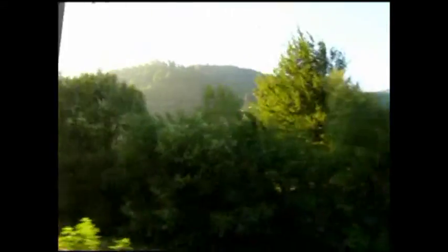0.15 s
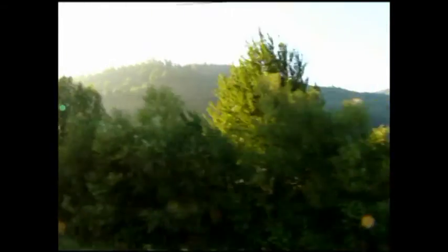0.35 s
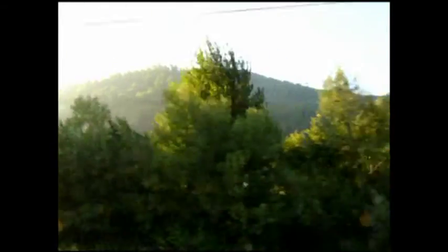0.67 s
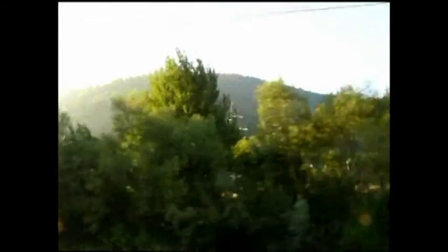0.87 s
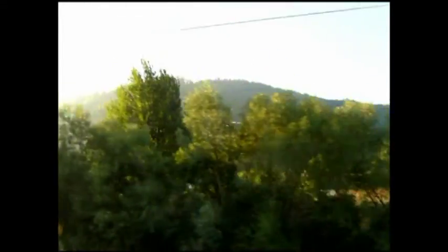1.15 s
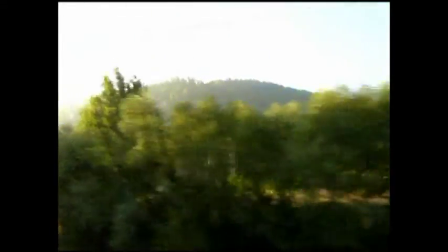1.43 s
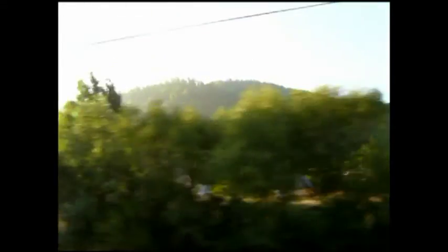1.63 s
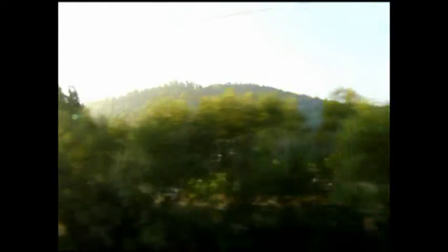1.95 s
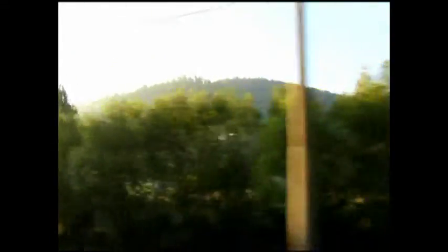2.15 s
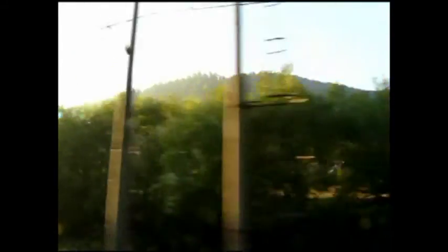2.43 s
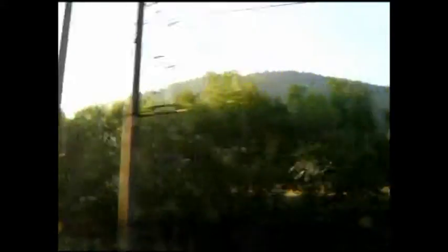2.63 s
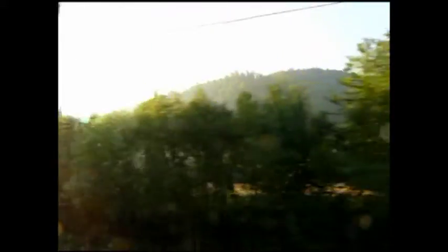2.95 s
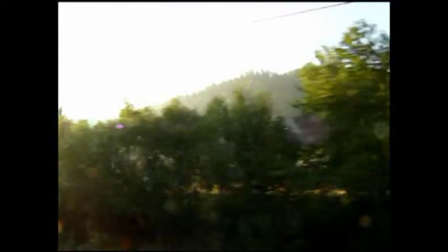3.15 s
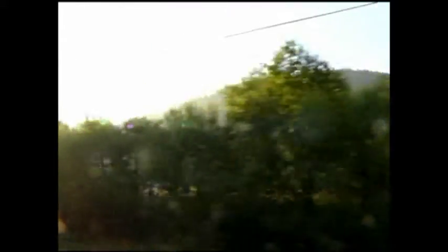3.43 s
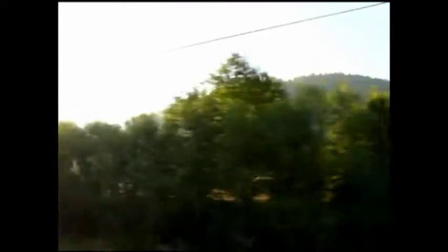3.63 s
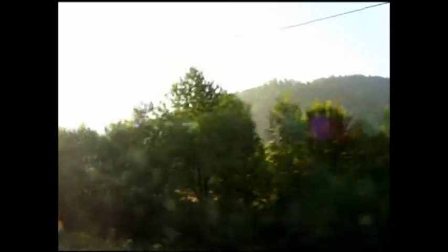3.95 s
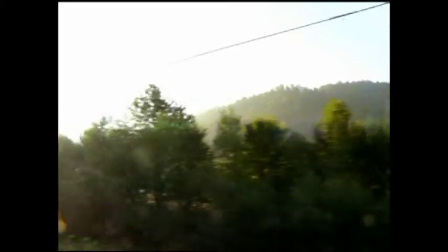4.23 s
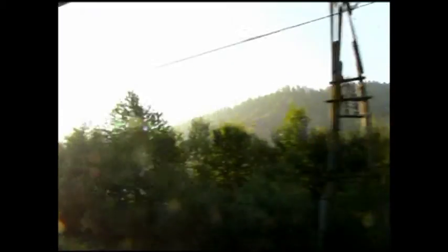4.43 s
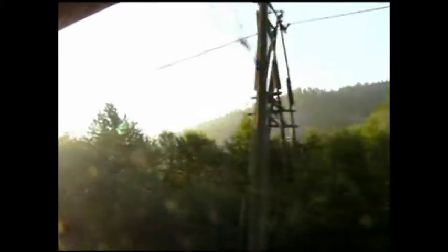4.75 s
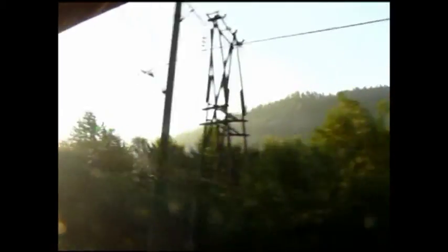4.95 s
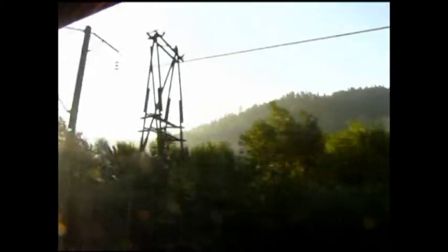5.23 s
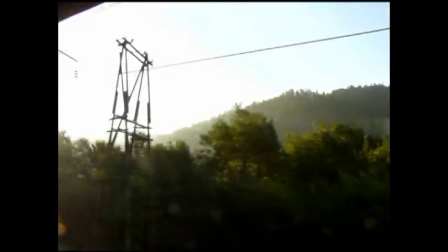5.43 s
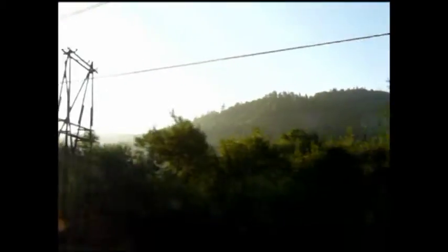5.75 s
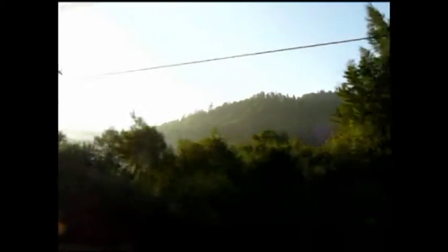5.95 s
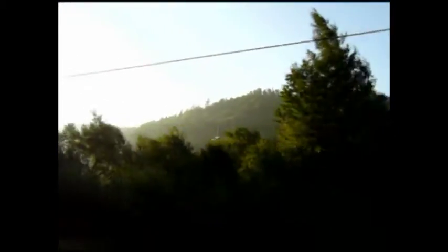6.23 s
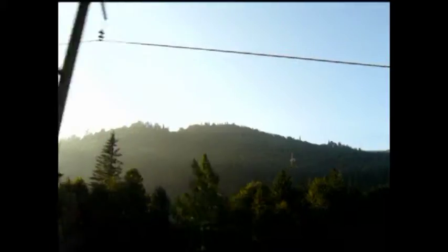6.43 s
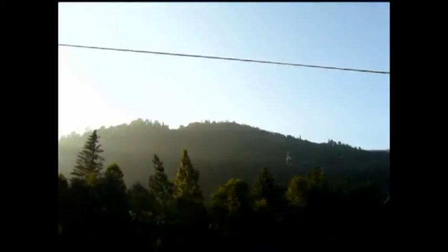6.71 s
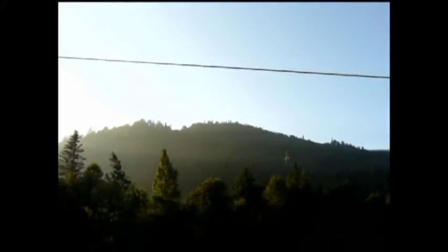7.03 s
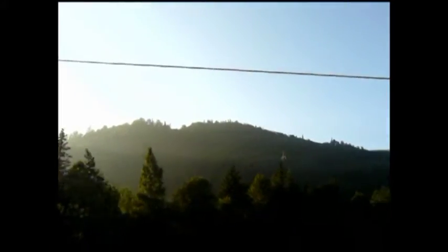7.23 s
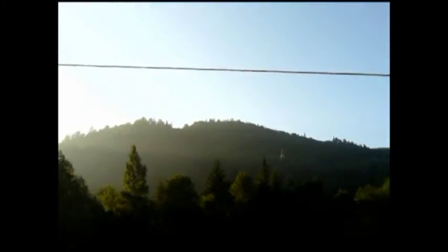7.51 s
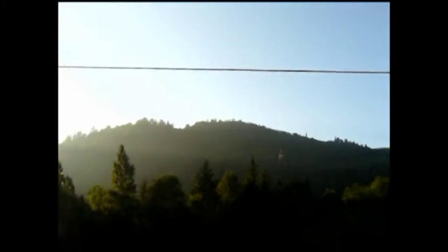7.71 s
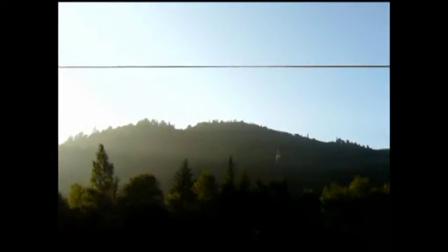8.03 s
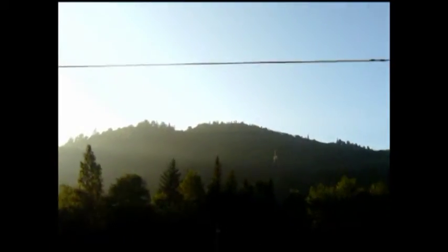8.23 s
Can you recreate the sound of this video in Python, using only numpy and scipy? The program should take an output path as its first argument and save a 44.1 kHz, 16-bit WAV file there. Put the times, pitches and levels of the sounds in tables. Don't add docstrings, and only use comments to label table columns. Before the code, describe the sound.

Inside a moving rail carriage, a continuous wheel roar fills the sound: deep body rumble, hollow midrange panel drone and muted hiss, flickering unevenly. A thud and rattling crack land near 0.3 s, followed by smaller knocks through 1.4 s. Harder jolts strike around 1.7, 2.0 and 2.8 s, the last with a bright burst of fittings rattle, then another at 3.4 s. From 3.6 to 5.6 s the rolling is somewhat quieter, with scattered dull bumps and a crack near 4.9 s. At about 5.8 s rough track begins: heavy thumps come several per second, the roar surges from 6.4 to 7.1 s, and dense bangs, cracks and shivering panels continue until the end at about 8.4 s. The small camera microphone is close, dull and band-limited, with faint grainy treble; its level ducks after hard hits and recovers.

```python
import sys
import numpy as np
from scipy import signal
from scipy.fft import rfft, irfft, next_fast_len
from scipy.io import wavfile
from scipy.ndimage import uniform_filter1d

SR = 44100
rng = np.random.default_rng(int(sys.argv[2]) if len(sys.argv) > 2 else 0)


def to_linear_factor(level_db):
    exponent = np.asarray(level_db, float) / 20
    return 10 ** exponent


def store_pcm(level_fs):
    pcm = np.round(np.clip(level_fs, -1, 1) * 32767).astype(np.int16)
    wavfile.write(sys.argv[1], SR, np.atleast_2d(pcm).T)


N = 369116
FFT = next_fast_len(N)
TIME, HZ = np.arange(N) / SR, np.fft.rfftfreq(FFT, 1 / SR)


def unit(x):
    return x / np.sqrt(np.mean(x ** 2))


def colour(table):
    hz, db = np.transpose(table)
    return to_linear_factor(np.interp(np.log(HZ + 1), np.log(hz), db))


def walk(rate):
    hold = int(SR / rate)
    held = np.repeat(rng.standard_normal(N // hold + 1), hold)
    slewed = uniform_filter1d(uniform_filter1d(held, hold), hold)
    return unit(slewed[:N])


# frequency in Hz, density in dB per Hz.
ROAR_SPECTRUM = [(18, -34), (40, -13), (110, -8), (244, -5.5), (312, -8.5), (460, -6.5), (765, -8.5),
                 (900, -16), (1270, -19), (1900, -21), (2700, -17.5), (3400, -25), (3800, -25.5),
                 (4000, -25)]
# resonance in Hz, width in Hz, lift in dB.
PANEL_RESONANCES = [(261.4, 50, 7), (379, 56, 6), (998, 69, 6.5), (1600, 150, 6.5), (2284, 240, 3),
                    (3090, 57, 1)]
# lower edge in Hz, upper edge in Hz.
ROLL_BANDS = [
    (1300, 3500),
    (380, 1000),
    (60, 380),
]


def roar(shake_db=0.68, flicker_db=1.5):
    lift_db = sum(db / (1 + (2 * (HZ - hz) / width) ** 2) for hz, width, db in PANEL_RESONANCES)
    shape = colour(ROAR_SPECTRUM) * to_linear_factor(lift_db)
    power = shape ** 2 / len(HZ)
    own_db = [10 * np.log10(power[(HZ > lo) & (HZ < hi)].sum()) for lo, hi in ROLL_BANDS]
    hiss, drone, rumble = (db - own for db, own in zip(roll_levels(), own_db))
    noise = rfft(rng.standard_normal(FFT)) * shape
    shake = shake_db * walk(45)
    out = 0
    for centre in np.arange(5, 12.5, .5):
        window = np.cos(np.pi * np.clip(np.log2(HZ + 1) - centre, -.5, .5)) ** 2
        band = irfft(noise * window, FFT)[:N]
        low, high = np.clip(9 - centre, 0, 1), np.clip(centre - 9.75, 0, 1)
        db = high * hiss + low * rumble + (1 - low - high) * drone
        db = db + (1 - high) * shake + flicker_db * walk(25)
        out = out + band * to_linear_factor(db)
    return out


# time in seconds, rolling level in dB, track roughness in dB.
ROLLING = [(0, -53.5, 6.5), (.55, -52, -5.5), (1.001, -49.5, 4.5), (1.4, -46.5, 0), (1.65, -48, 1),
           (2.15, -48, 0), (2.6, -43.5, -2.5), (3.1, -47, 0), (3.7, -49.5, -5), (4.27, -51.5, 1),
           (4.7, -47.5, -2.5), (5.299, -46.5, 2.5), (5.849, -41.5, 2), (6.3, -44.5, 2), (6.84, -44, 2.5),
           (7.301, -42, 4), (7.669, -38, 3.5), (8.37, -46.5, 3.5)]


def roll_levels():
    drone_db, rumble_db = 7, 8.5
    drone_share = 0.41
    loud_start_s, loud_end_s, loud_db = 6.354, 7.082, 9.5
    body_share = 0.81
    s, db, rough = np.transpose(ROLLING)
    lift = loud_db * ((TIME > loud_start_s) & (TIME < loud_end_s))
    rolling = np.interp(TIME, s, db) + lift
    rough, duck = np.interp(TIME, s, rough), gain_control()
    hiss = rolling + duck
    drone = rolling + drone_db + drone_share * rough + 0.94 * duck
    rumble = rolling + rumble_db + rough - (1 - body_share) * lift + 0.9 * duck
    return hiss, drone, rumble


# time in seconds, depth in dB, recovery in seconds.
DUCKS = [(.336, 4, 0.37), (1.673, 6.5, 0.49), (2.789, 5.5, 0.66), (3.456, 4, .4), (4.879, 3, 0.24),
         (6.596, 9.5, 0.06), (7.081, 9.5, 0.051), (7.43, 4, .06), (7.514, 9.5, .1), (7.828, 7.5, 0.077),
         (7.232, 5.5, 0.082), (7.058, 5, .05), (7.382, 5, .08), (5.99, -0.5, .15), (8.03, 2.5, .06),
         (8.27, 7, 0.2)]


def gain_control():
    return sum(-db * (TIME > s) * np.exp(-np.maximum(TIME - s, 0) / back) for s, db, back in DUCKS)


# time in seconds, strength in dB,
# depth in dB, hardness in dB.
JOLTS = [(.023, -21.5, -13.5, -9.5), (.325, -19, -17, -8.5), (.368, -33.5, -12, -21),
         (.741, -29, -7, -16.5), (.937, -37, -11, -22), (1.008, -29, -7, -3.5), (1.111, -28.5, 0.5, -26),
         (1.186, -25.5, -19, -0.5), (1.347, -25.5, -24, -2.5), (1.375, -29.5, -4.5, -16),
         (1.667, -18.5, -16.5, 0.5), (1.797, -30.5, -3, -8.5), (2.019, -26.5, -6.5, -11.5),
         (2.039, -24, -18, -10.5), (2.076, -26.5, -5, -2), (2.682, -29.5, -10.5, -29),
         (2.764, -17, -6, -1.5), (2.804, -21.5, -8, -2.5), (2.945, -24.5, -19, -4.5),
         (3.447, -16.5, -9.5, -5.5), (3.59, -25.5, -10.5, -10), (4.121, -23.5, -9, -1.5),
         (4.384, -30.5, -26.5, -11.5), (4.54, -30.5, -21, -17.5), (4.63, -27, -30, -9.5),
         (4.868, -35, -17, 13), (4.88, -19, -18.5, -20.5), (5.217, -30, -12, -11), (5.511, -27, -22.5, -1),
         (.165, -32, -15, -7), (0.255, -42.5, 12.5, -11), (0.353, -44, -10, 4.5), (0.55, -37.5, 4.5, -13),
         (0.718, -42.5, -6, 7.5), (.862, -36.5, -17.5, 1), (1.051, -46.5, 13.5, -8),
         (1.448, -40.5, -11.5, 5.5), (1.778, -33, -17, -8.5), (1.835, -44.5, -6, 8.5),
         (1.997, -34.5, -0.5, -10.5), (2.187, -33, 3, -19), (2.318, -45, -17, 13.5), (2.337, -46, -4, 10),
         (2.47, -40, -9.5, 12.5), (3.199, -42.5, -6, 11.5), (3.213, -34.5, -24.5, -0.5),
         (2.795, -30.5, -9.5, 3), (3.798, -52, 10, -6), (3.876, -56, 13, -9), (4.164, -36, -8.5, -21),
         (4.188, -32, -10.5, -12.5), (4.474, -33, -31.5, -14.5), (4.573, -44.5, 7, -5),
         (4.664, -45, 6, -13.5), (4.842, -50.5, -8, 4.5), (4.93, -38.5, 11.5, -15), (5.254, -40.5, 10, -15),
         (5.654, -38, -8.5, 16), (5.673, -40, -9.5, 11),
         (5.776, -18, -5.5, -18), (5.788, -30.5, -7.5, 6), (5.976, -16.5, -23, -8), (6.107, -38, 10, -3),
          (6.128, -17.5, -18.5, -11), (6.3, -43, 9, -6), (6.355, -36.5, -17, 9), (6.374, -17.5, -21, 1),
          (6.527, -16, -16, -27), (6.589, -29, -4, 7), (6.616, -29.5, -4, 10.5), (7.113, -30.5, -4, -2.5),
          (7.056, -16.5, -2.5, -15.5), (7.072, -26.5, -5.5, 8), (7.226, -15.5, -9.5, -4),
          (7.248, -20.5, -9, -2), (7.376, -14.5, -9, -7.5), (7.419, -15.5, -19, -7),
          (7.518, -15, -13.5, -11), (7.645, -22.5, -19, -12), (7.685, -17.5, -13.5, -4),
          (7.802, -27.5, -8, 10.5), (7.819, -17.5, -12.5, -12), (7.953, -18, -18.5, -1),
          (7.975, -28, 5, -6), (8.012, -30, 9, -11), (8.109, -17.5, -21.5, -10), (8.163, -41.5, 10, -17),
          (8.264, -16, -6.5, -9), (8.296, -23, -12, -1.5)]


def impacts():
    return np.transpose(JOLTS)


def part(s, db, hz, ms):
    pitch = hz * np.exp(0.08 * rng.standard_normal(len(s)))
    return np.transpose(np.broadcast_arrays(s, db, pitch, ms))


def ring_modes(table, octaves, stretch, rise, boost_db):
    out, size = np.zeros(N + SR), SR // 8
    pushes = signal.lfilter([1], [1, -.99], rng.standard_normal((len(table), size)))
    for (s, db, hz, ms), push in zip(table, pushes):
        edges = 1.043 * hz * 2 ** (np.array([-octaves, octaves]) / 2)
        ring = signal.sosfilt(signal.butter(3, edges, "band", fs=SR, output="sos"), push)
        age = np.linspace(0, 1, int(stretch * ms * SR / 1000) + 40)
        swell = np.sin(np.pi * age ** rise) ** 2
        start = max(int(s * SR - len(age) * .5 ** (1 / rise)), 0)
        burst = unit(swell * ring[-len(age):]) / unit(swell).max()
        out[start:start + len(age)] += to_linear_factor(db + boost_db) * burst
    return out[:N]


def floor_thuds(s, db, depth):
    thud_hz, db_per_octave, thud_ms = 148.5, 23, 13.53
    floor = part(s, db, thud_hz * 2 ** (-depth / db_per_octave), thud_ms)
    return floor, ring_modes(floor, octaves=1.3, stretch=1.9, rise=.85, boost_db=0)


def wall_knocks(s, db, hard):
    knock_hz, knock_ms, lead_s = 604, 8.5, .0015
    walls = part(s - lead_s, db + hard, knock_hz, knock_ms)
    return walls, ring_modes(walls, octaves=1.3, stretch=1.8, rise=.65, boost_db=0)


def body_booms(s, db, depth):
    boom_hz, boom_ms, lag_s = 84, 24, 0.0027
    body = part(s + lag_s, db + depth, boom_hz, boom_ms)
    return ring_modes(body, octaves=1.3, stretch=1.7, rise=.8, boost_db=-2)


# time in seconds, level in dB, ring in Hz, length in ms.
RATTLES = [(.022, -34, 1400, 7), (.3223, -24, 1600, 4.5), (0.344, -41, 1500, 5.5),
           (1.1938, -39.5, 1600, 31), (1.3487, -40.5, 1600, 14), (1.6681, -31, 1700, 5.5),
           (1.7822, -35, 1300, 2.1), (2.0173, -45.5, 1600, 6), (2.768, -21.5, 2200, 8),
           (2.779, -25, 1500, 6.6), (2.794, -32, 1200, 6), (2.805, -34, 1300, 8), (3.4473, -28.5, 1400, 5),
           (3.453, -22, 1700, 3), (4.1217, -33.5, 1300, 4.7), (4.8683, -28.5, 1900, 2.5),
           (4.879, -32.5, 1250, 7), (5.978, -36, 1300, 21), (5.651, -40.5, 1100, 7),
           (6.3637, -29, 2000, 24), (7.0743, -20.5, 1800, 4.5), (7.2476, -20.5, 1500, 4),
           (7.3737, -35, 1500, 8), (7.4181, -42.5, 1500, 12), (7.49, -36.5, 2097, 25),
           (7.5, -32.5, 1600, 4.5), (7.5261, -31.5, 1300, 7.3), (7.8048, -22.5, 1300, 4),
           (7.966, -33, 1600, 33), (8.2672, -27, 1600, 5.3)]


def fitting_cracks(s, db, hard):
    tick_hz, tick_ms, tick_db = 1500, 6, -14
    ticks = part(s, db + hard + tick_db, tick_hz, tick_ms)
    return ring_modes(np.vstack([ticks, RATTLES]), octaves=1.6, stretch=1.7, rise=.65, boost_db=-1)


def rebounds(floor, walls, db):
    bounce_s, bounce_db, hard_db = .013, -11, -29
    hard_hits = np.vstack([floor, walls])[np.tile(db > hard_db, 2)]
    bounced = hard_hits + [bounce_s, bounce_db, 0, 0]
    return ring_modes(bounced, octaves=1.5, stretch=1.8, rise=.65, boost_db=0)


# time in seconds, level in dB, ring in Hz, length in ms.
SHIVERS = [(1.39, -44.5, 2110, 55), (2.33, -44.5, 1400, 35), (2.47, -43, 1500, 30), (2.96, -44.5, 2104, 30),
           (3.4585, -36, 2094, 5.4), (4.874, -37.5, 2110, 4), (5.99, -39, 2300, 35),
           (6.13, -35.5, 2090, 18), (7.222, -38, 1582, 7), (7.257, -35.5, 1250, 3),
           (7.645, -36.5, 1500, 30), (8.108, -37.5, 1904, 34), (8.3016, -30.5, 1500, 2.5),
           (.034, -30, 220, 16), (1.02, -33, 280, 25), (1.2, -33, 550, 22), (1.358, -33, 476, 28),
           (5.76, -27, 161, 18), (5.99, -27, 563, 24), (6.357, -28.5, 896, 6), (6.524, -19, 260, 28),
           (6.572, -23.5, 190, 24), (6.68, -23, 200, 24), (7.07, -27, 600, 6)]


def pane_shivers():
    return ring_modes(SHIVERS, octaves=1.6, stretch=1.7, rise=.65, boost_db=-1)


def scene():
    s, db, depth, hard = impacts()
    floor, thuds = floor_thuds(s, db, depth)
    walls, knocks = wall_knocks(s, db, hard)
    heard = roar() + thuds + knocks + body_booms(s, db, depth) + fitting_cracks(s, db, hard)
    heard = heard + rebounds(floor, walls, db) + pane_shivers()
    return heard[None]


def roll_off(x):
    return signal.sosfilt(signal.butter(12, 15720, fs=SR, output="sos"), x)


# frequency in Hz, gain in dB.
CONVERTER = [(3500, -0.5), (4000, -12.5), (4300, -14.5), (4600, -21), (5000, -38.5), (5500, -57),
             (7000, -66.5), (9000, -74), (11500, -69), (13000, -54.5), (14500, -65), (15500, -73.5)]


def record(dry):
    rate_hz, offset = 8000, -.0068
    noisy = dry + to_linear_factor(-62.0) * rng.standard_normal(N)
    base = irfft(rfft(noisy, FFT) * (HZ < rate_hz / 2), FFT)[:, :N] + offset
    comb = 1 + 2 * np.cos(2 * np.pi * rate_hz * TIME) + 2 * np.cos(4 * np.pi * rate_hz * TIME)
    heard = irfft(rfft(base * comb, FFT) * colour(CONVERTER), FFT)[:, :N]
    heard = heard + to_linear_factor(-94.0) * rng.standard_normal(N)
    return roll_off(heard)


dry = scene()
out = record(dry)
store_pcm(out)
```